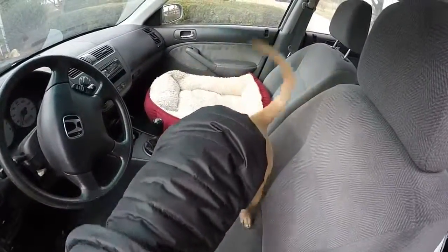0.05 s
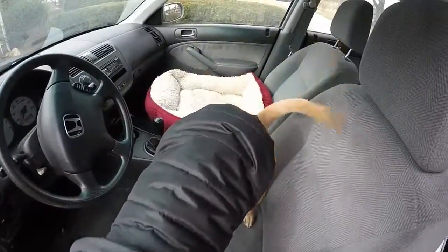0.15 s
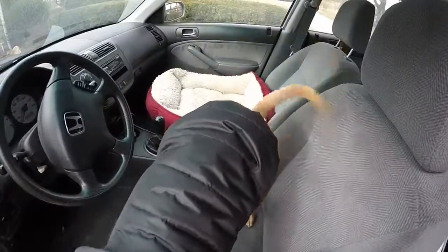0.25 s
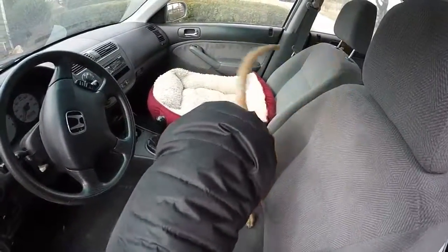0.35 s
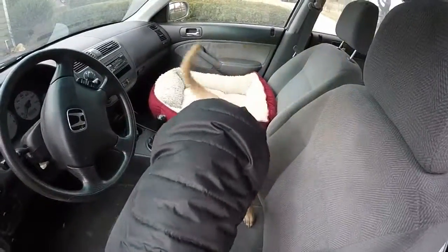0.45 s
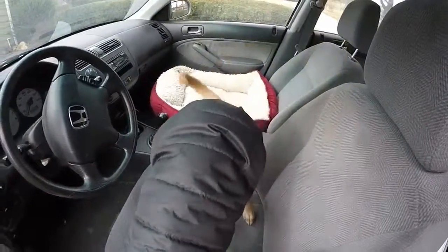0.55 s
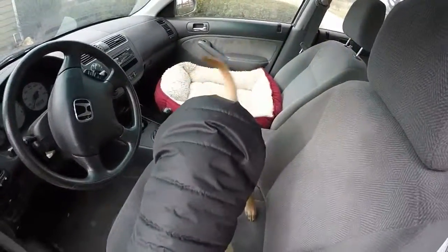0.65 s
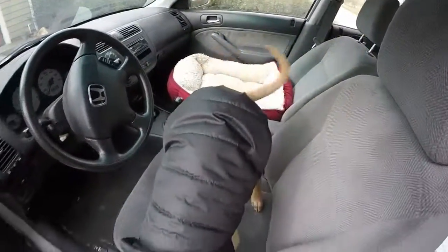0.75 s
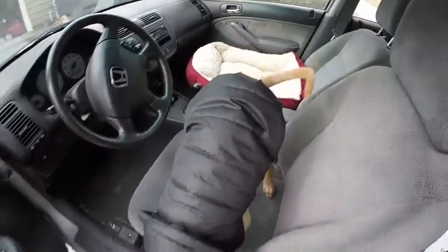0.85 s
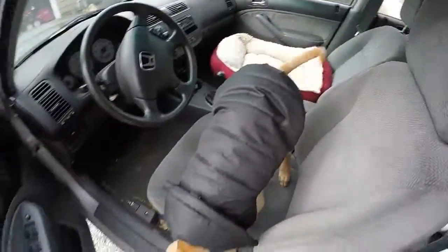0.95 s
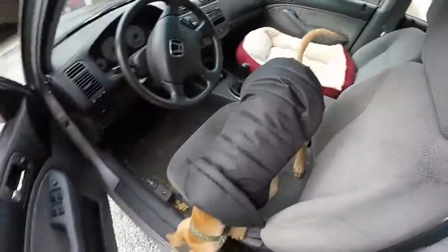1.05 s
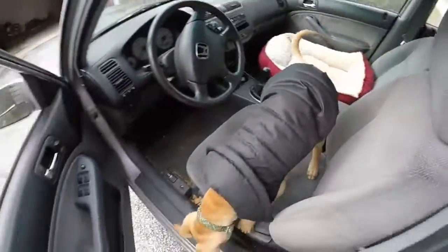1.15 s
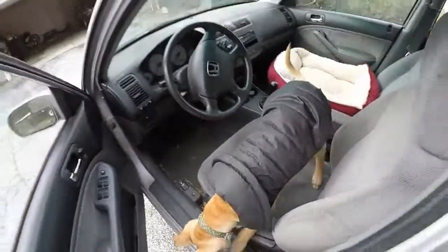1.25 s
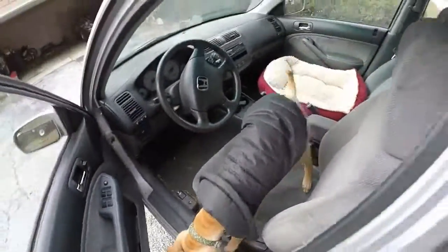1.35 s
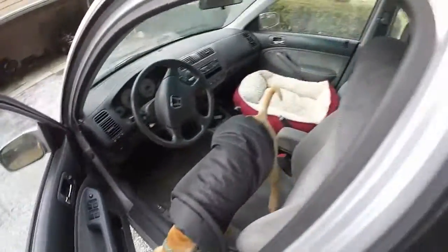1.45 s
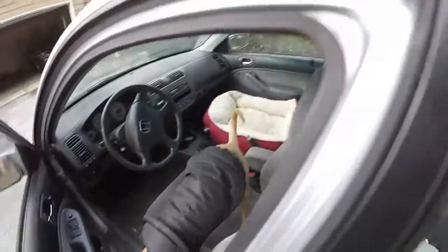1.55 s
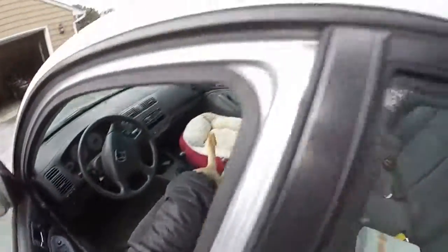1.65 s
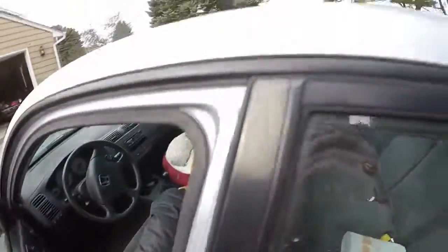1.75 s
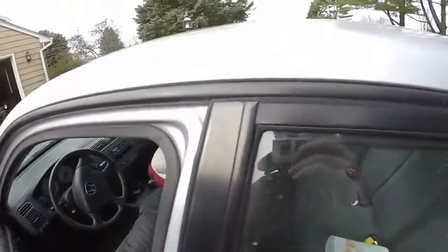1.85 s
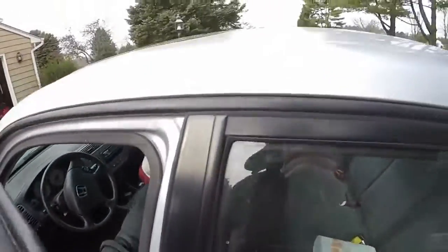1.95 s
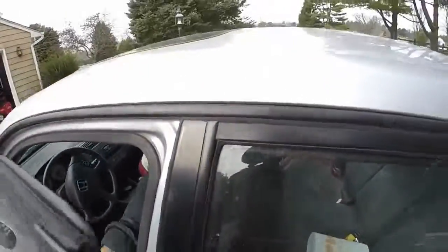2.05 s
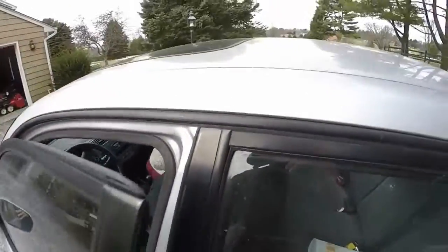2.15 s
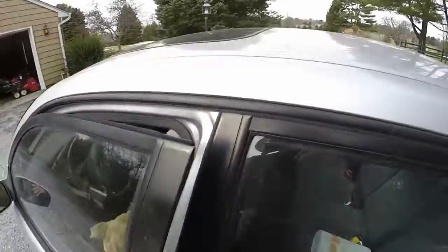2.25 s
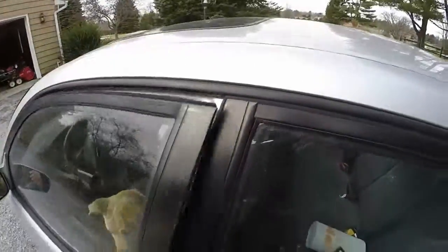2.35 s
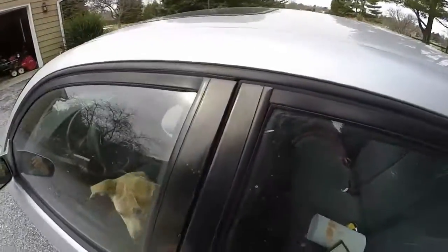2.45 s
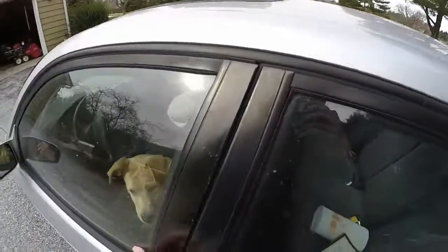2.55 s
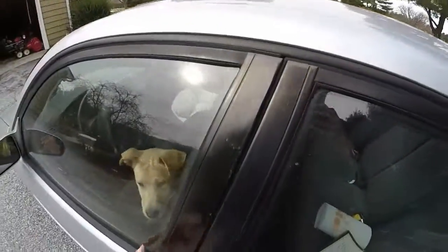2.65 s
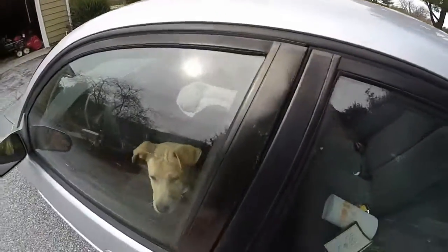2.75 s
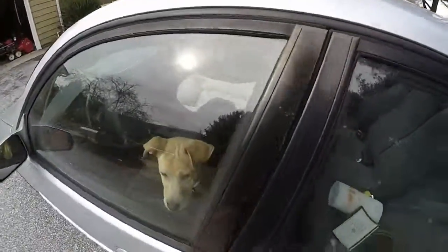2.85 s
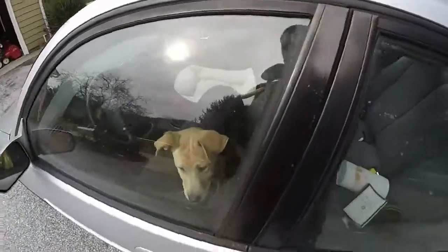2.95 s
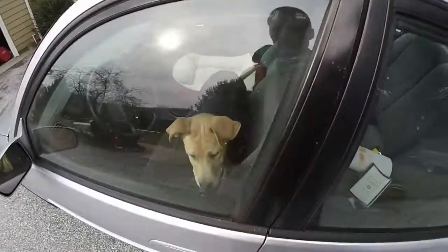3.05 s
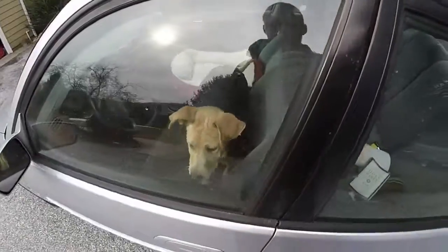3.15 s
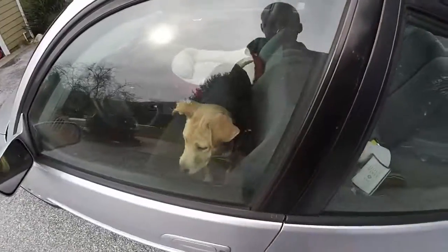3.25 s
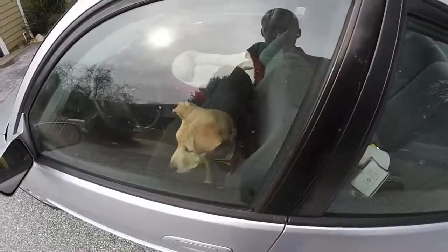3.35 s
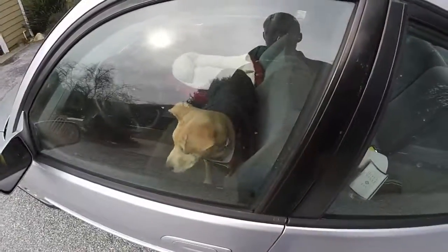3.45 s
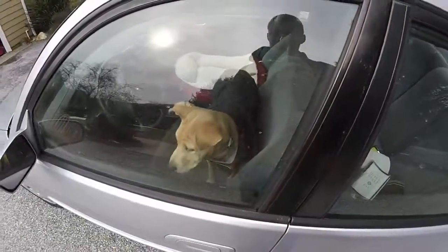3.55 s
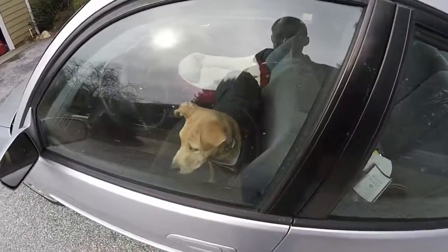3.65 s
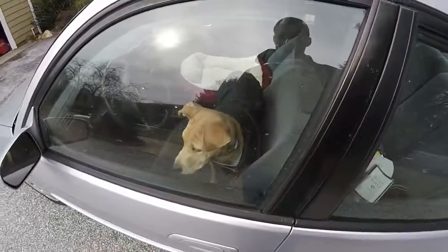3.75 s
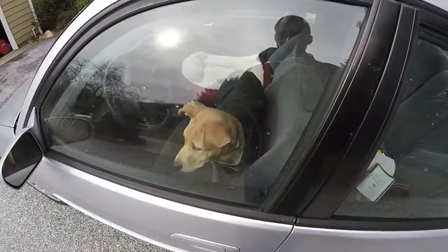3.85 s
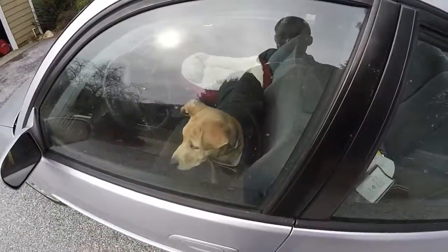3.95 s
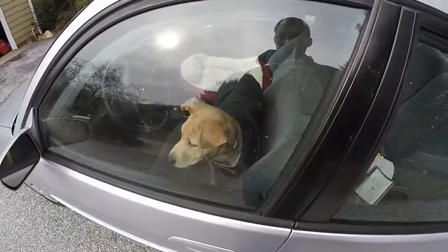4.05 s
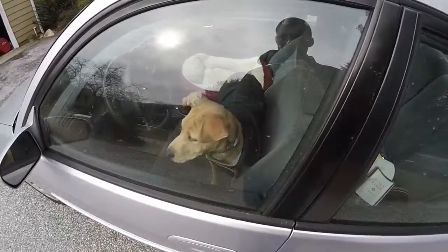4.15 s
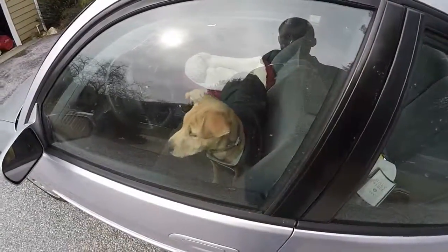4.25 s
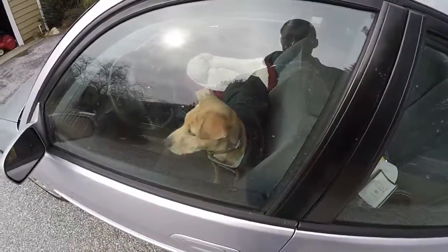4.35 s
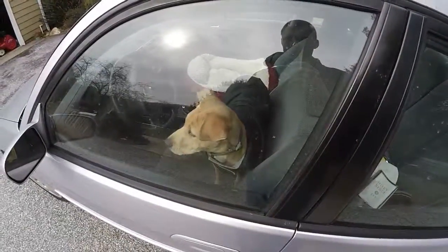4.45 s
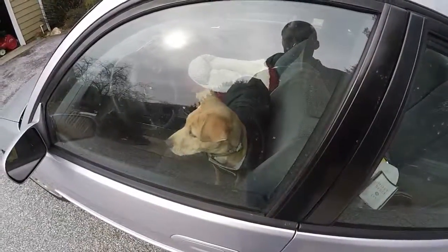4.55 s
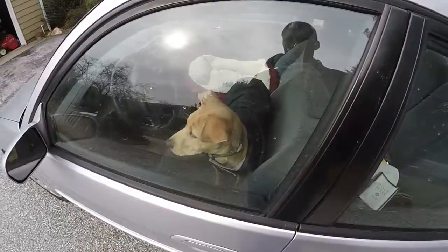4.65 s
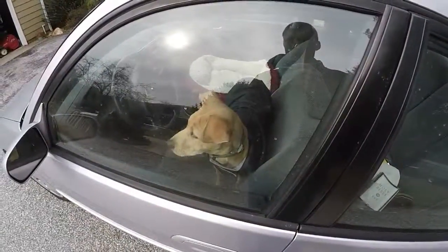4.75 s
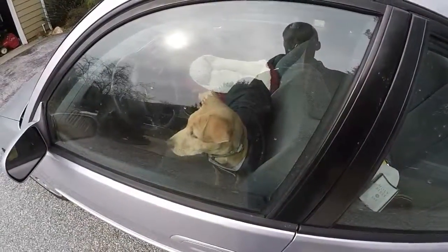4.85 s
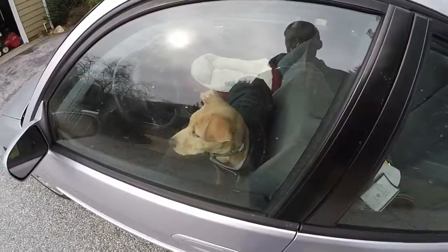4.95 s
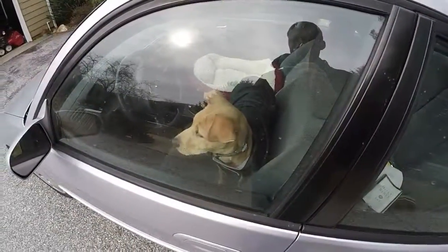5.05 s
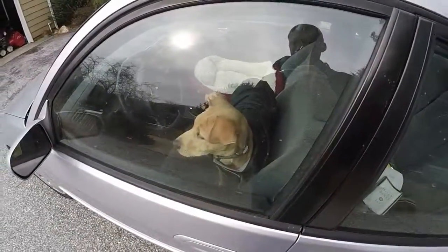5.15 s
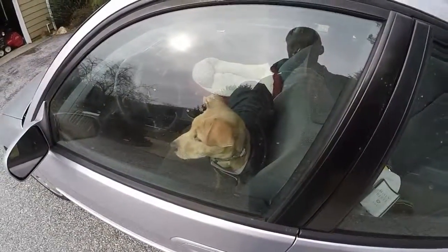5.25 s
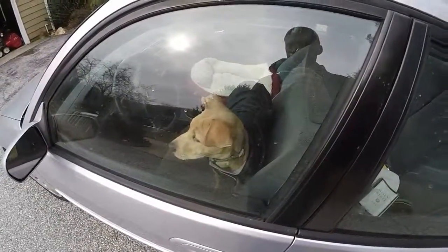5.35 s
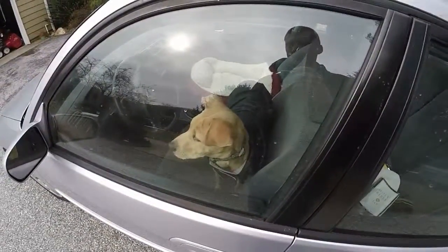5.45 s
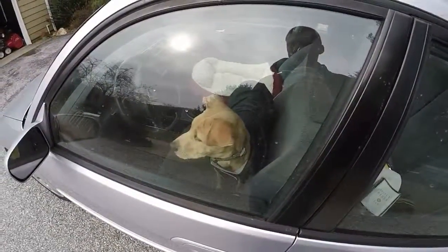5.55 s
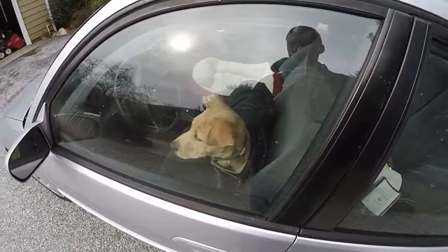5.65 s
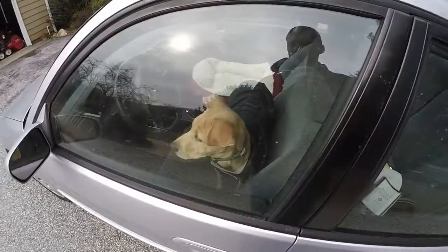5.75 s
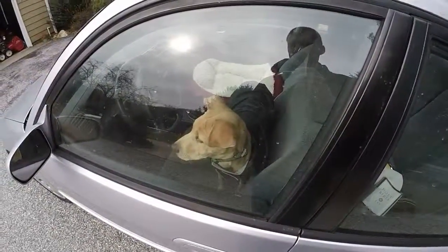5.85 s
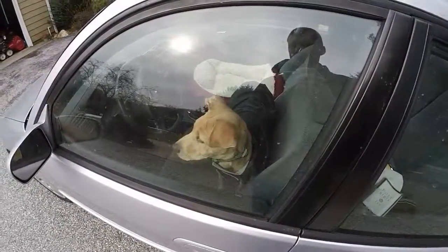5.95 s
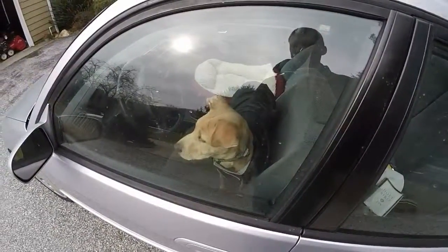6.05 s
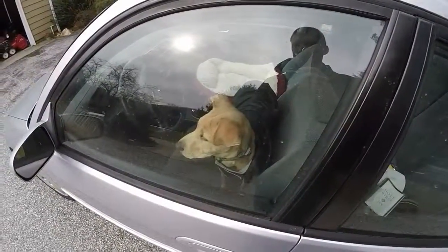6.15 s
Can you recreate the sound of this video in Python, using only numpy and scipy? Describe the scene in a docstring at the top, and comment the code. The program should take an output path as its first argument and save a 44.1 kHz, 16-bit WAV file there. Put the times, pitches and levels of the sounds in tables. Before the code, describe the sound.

Cloth rustles, small knocks and a thin dog whine lead to one solid car door slam, followed by faint birds and distant traffic.

```python
"""Shutting a car door on a dog

A dog in a padded jacket shuffles on a car seat: friction makes the cloth rustle, impacts ring the trim,
and a thin harmonic whine falls. Someone steps back and swings the door shut. It meets its seal and
latches twice, exciting the damped modes of latch, door skin and enclosed air, so the cabin booms.
The person's steps and sleeve scuff softly amid a faint low hum, distant traffic and a few small birds."""
import sys
import numpy as np
from scipy import signal
from scipy.fft import rfft, irfft, next_fast_len
from scipy.io import wavfile
from scipy.ndimage import map_coordinates

SR = 44100
rng = np.random.default_rng(int(sys.argv[2]) if len(sys.argv) > 2 else 0)


def int16_out(signal):
    """Quantize to a 16-bit WAV file."""
    q = np.round(np.clip(np.atleast_2d(signal).T, -1, 1) * 32767)
    wavfile.write(sys.argv[1], SR, q.astype(np.int16))


N = 273905
TIME = np.arange(N) / SR
HIT_TIME = TIME[:SR // 2]


def amp(db):
    """Amplitude grows tenfold every 20 dB."""
    return 10 ** (np.asarray(db) / 20)

def unit(x):
    """Normalisation to an rms of 1."""
    return x / np.sqrt(np.mean(x ** 2) + 1e-20)

def spectrum(points):
    """A frequency response through (Hz, dB) points, interpolated on a log axis."""
    hz, db = np.transpose(points)
    return lambda f: amp(np.interp(np.log(f + 1), np.log(hz + 1), db))

def curves(rows):
    """Linear interpolation in time of each column after the first."""
    times, *columns = np.transpose(rows)
    return [np.interp(TIME, times, column) for column in columns]

def wobble(rate, size=N):
    """Smooth random modulation: a spline with `rate` knots a second."""
    return map_coordinates(rng.standard_normal(int(size * rate / SR) + 4), [TIME[:size] * rate])

def filtered(x, response):
    """Filtering multiplies the spectrum by a frequency response."""
    size = next_fast_len(len(x) + 8192)
    return irfft(rfft(x, size) * response(np.fft.rfftfreq(size, 1 / SR)), size)[:len(x)]

def noise(response, size):
    """Filtering colours white noise; the rms is 1."""
    return unit(filtered(rng.standard_normal(size), response))

def fade(t60, attack):
    """Damping: after a quick rise, amplitude falls 60 dB in t60 seconds."""
    return np.exp(-np.log(1000) * HIT_TIME / t60) * (1 - np.exp(-HIT_TIME / attack))

def ring(modes, attack, scatter_db):
    """Free vibration is a sum of damped modes, their strengths scattered at each strike."""
    return sum(amp(db + scatter_db * rng.normal()) * np.sin(2 * np.pi * hz * HIT_TIME)
               * fade(t60, attack) for hz, db, t60 in modes)

def crash(bands, attack):
    """Modes too dense to resolve act as decaying bands of noise about an octave wide."""
    return sum(noise(lambda f: np.exp(-2 * np.log2((f + 1) / hz) ** 2), len(HIT_TIME))
               * amp(db) * fade(t60, attack) for hz, db, t60 in bands)

def echo(x, t60):
    """Diffuse reflection: convolution with a decaying tail of noise."""
    tail = rng.standard_normal(len(HIT_TIME)) * fade(t60, attack=.005)
    return signal.fftconvolve(x, tail / np.linalg.norm(tail))[:N]

def add(track, start, sound):
    """Superposition of a sound on the track, from `start` seconds."""
    part = track[round(start * SR):][:len(sound)]
    part += sound[:len(part)]


# Far traffic. Each row: frequency in Hz, relative spectral density in dB.
TRAFFIC_SPECTRUM = [(12, -32), (20, -2), (121, -3.5), (148, -6), (230, -10), (264, -13.5), (287, -15.5),
                    (379, -19), (780, -18.5), (1840, -30.5), (2720, -29), (6080, -35.5), (7390, -40.5),
                    (8490, -41), (15200, -45)]
# A distant machine. Each row: frequency in Hz, relative level in dB.
HUM_PARTIALS = [(118.4, -52), (236.9, -61.5), (419.9, -68)]
# Air stirred against the microphone. Each row: time in seconds, level in dB.
DRAUGHT_LEVELS = [(0, -43.5), (.8, -49.5), (1.3, -39), (1.9, -43.5), (2.35, -47.5), (2.75, -38.5),
                  (3.1, -46), (3.6, -56)]
# Screening by the car's body. Each row: time in seconds, traffic gain in dB, hum gain in dB.
SHELTER_GAINS = [(0, -5.5, -7), (1.2, -3, -1.5), (2.2, .5, 0)]

def outdoors():
    """Traffic and hum start in the car's acoustic shadow; turbulence from moving about adds rumble."""
    traffic = amp(-45.5 + 0.22 * wobble(3.23)) * noise(spectrum(TRAFFIC_SPECTRUM), N)
    hum = sum(amp(db + 3 + 2.76 * wobble(7)) * np.sin(2 * np.pi * hz * TIME + .8 * wobble(11))
              for hz, db in HUM_PARTIALS)
    draught_db, = curves(DRAUGHT_LEVELS)
    rumble = spectrum([(10, -27), (28, -3), (70, -10), (200, -20.5), (1000, -64)])
    draught = amp(draught_db + 2.7 * wobble(10)) * noise(rumble, N)
    traffic_db, hum_db = curves(SHELTER_GAINS)
    return amp(traffic_db) * traffic + amp(hum_db) * hum + draught


def bird(contour_hz, notes):
    """Frequency modulation: each note is a pure tone gliding through the pitches of its contour, reached at
    even steps of time."""
    out = np.zeros(N)
    for start, length, db in notes:
        progress = np.linspace(0, 1, int(length * SR))
        pitch_hz = np.interp(progress, np.linspace(0, 1, len(contour_hz)), contour_hz)
        pitch_hz *= 1 + .009 * wobble(300, len(progress))
        envelope = np.sqrt(2 * abs(np.sin(np.pi * progress)))
        add(out, start, amp(db) * envelope * np.sin(2 * np.pi * np.cumsum(pitch_hz) / SR))
    return out

def birds():
    """Five kinds of short call, with faint reflections from trees and walls."""
    # Each note: start in seconds, length in seconds, level in dB.
    held = bird([6300, 7400, 7250, 7250, 7300, 7300], [(3.752, .078, -51.5)])
    falling = bird([8150, 7480, 7250], [(3.95, .027, -53), (4.98, .026, -55)])
    arched = bird([3470, 4160, 3600], [(4.735, .0506, -58)])
    stepped = bird([2550, 2700, 3350, 3300], [(5.27, .045, -64), (5.555, .043, -61), (5.982, .04, -56.5)])
    low = bird([1380, 1650, 1460], [(4.53, .09, -62), (4.93, .11, -64)])
    calls = held + falling + arched + stepped + low
    return calls + amp(-8) * echo(calls, t60=.45)


def cloth(response, size, grain_db, grain_rate):
    """Stick-slip friction: fabric moves in tiny uneven jerks, which modulate a noise."""
    slips = rng.standard_normal(size) * amp(grain_db * wobble(grain_rate, size))
    return unit(filtered(slips, response))

# A coat sleeve beside the microphone. Each row: time in seconds, level in dB.
SLEEVE_LEVELS = [(0, -54), (.62, -57), (.95, -48.5), (1.5, -52), (1.9, -56.5), (2.4, -54.5), (2.7, -59),
                 (4, -60.5)]

def sleeve():
    """Faint sliding friction of a sleeve, which quietens as the arm comes to rest."""
    level_db, = curves(SLEEVE_LEVELS)
    colour = spectrum([(200, -12), (600, -3.5), (1500, 1), (4000, -3), (9000, -10.5), (15000, -18)])
    return amp(level_db + 0.82 * wobble(25.13)) * cloth(colour, N, grain_db=1, grain_rate=500)


# Contact noise. Each row: frequency in Hz, relative spectral density in dB.
CLICK_SPECTRUM = [(150, -23), (500, 0), (1350, -0.5), (2500, -6.5), (4800, -7.5), (8000, -16), (15000, -27)]

def click(low_hz, bright_hz, t60, attack):
    """A brief contact is broadband, but a part radiates little below its lowest mode."""
    def radiated(f):
        treble_loss = np.hypot(1, (f / bright_hz) ** 2)
        bass_loss = np.hypot(1, (low_hz / (f + 1)) ** 2)
        return spectrum(CLICK_SPECTRUM)(f) / treble_loss / bass_loss
    return noise(radiated, len(HIT_TIME)) * fade(t60, attack)


# Dull rubbing. Each row: frequency in Hz, relative spectral density in dB.
RUB_SPECTRUM = [(60, -18), (150, -0.5), (330, 5.5), (600, -1), (1300, -3.5), (3000, -12.5), (6000, -22),
                (15000, -45)]
# The dog shuffles on the seat. Each row: time in seconds, relative level in dB.
DOG_SHUFFLE = [(0.0, -51), (0.11, -59.5), (0.75, -58), (0.86, -52), (1.03, -42.5), (1.16, -44.5),
               (1.68, -44), (1.94, -48.5), (2.26, -51.5), (2.42, -46)]
# Soft scuffs of a person's steps and sleeve after the door shuts, in the same columns.
PERSON_SCUFFS = [(2.7, -55), (2.856, -57.5), (3.074, -48.5), (3.3, -54.5)]

def shuffle_and_scuffs(creases_per_s=160, fade_db_per_s=68):
    """Friction and random creasing: first the dog on the seat, then the person's steps and sleeve."""
    level_db, = curves(np.vstack([DOG_SHUFFLE, PERSON_SCUFFS]))
    fade_db = fade_db_per_s * np.maximum(TIME - PERSON_SCUFFS[-1][0], 0)
    rub = cloth(spectrum(RUB_SPECTRUM), N, grain_db=2, grain_rate=400)
    creases = (rng.random(N) < creases_per_s / SR) * amp(4.5 * rng.standard_normal(N))
    tick = click(low_hz=700, bright_hz=5000, t60=.008, attack=.00018)
    crinkle = unit(signal.fftconvolve(creases, tick)[:N])
    return amp(level_db - 0.5 - fade_db + 1.5 * wobble(18)) * (rub + amp(-11) * crinkle)


def swell(length):
    """Friction noise follows sliding speed, which rises and falls a little unevenly."""
    return np.sin(np.pi * np.minimum(HIT_TIME / length, 1)) * amp(1.3 * wobble(72, len(HIT_TIME)))

def swish(length, centre_hz, q):
    """The tiny slips of a sliding weave make band-pass noise."""
    def weave(f):
        detuning = (f + 1) / centre_hz - centre_hz / (f + 1)
        return 1 / np.hypot(1, q * detuning) / np.hypot(1, f / 7500)
    return swell(length) * cloth(weave, len(HIT_TIME), grain_db=2, grain_rate=450)

# Strokes of the dog's nylon jacket and, last, a soft scuff from the person after the door shuts.
# Each row: midpoint in seconds, length in seconds, level in dB, swish centre in Hz.
CLOTH_STROKES = [(0.151, 0.089, -53.5, 5500), (0.37, 0.093, -49.5, 5500), (.51, .17, -50.5, 5500),
                 (1.051, 0.15, -49, 2510), (1.165, .16, -52, 4400), (1.399, .15, -43, 6200),
                 (1.539, .1, -35, 3370), (1.589, 0.054, -45, 6360), (2.33, 0.23, -56, 7000),
                 (3.1, .2, -55, 1400)]

def rustle():
    """Friction gives a dull rub and a swish, which is higher and broader for a faster slide."""
    out = np.zeros(N)
    for middle, length, db, swish_hz in CLOTH_STROKES:
        rub = swell(length) * cloth(spectrum(RUB_SPECTRUM), len(HIT_TIME), grain_db=2, grain_rate=370)
        slide = swish(length, swish_hz, q=1.54 * 3000 / swish_hz)
        add(out, max(middle - length / 2, 0), amp(db) * (rub + slide))
    # The jacket drags once across the seat's edge.
    add(out, .958, amp(-37.5) * swish(length=.05, centre_hz=2800, q=3))
    return out


# The dog's voice. Each row: harmonic number, relative level in dB.
WHINE_HARMONICS = [(1, -15.5), (2, -1), (3, -15.5), (4, -26)]
# Its notes. Each row: start and length in seconds, first and last pitch in Hz, level in dB.
WHINE_NOTES = [(1.835, 0.34, 1338, 1150, -44.5), (2.15, .095, 1340, 1204, -54.5)]

def whine(rise_s=.017, fade_s=.08):
    """A harmonic series, strongest on its second member; the fundamental holds briefly, then sags."""
    out = np.zeros(N)
    for start, length, first_hz, last_hz, level_db in WHINE_NOTES:
        t = TIME[:int(length * SR)]
        sag = np.sin(np.pi / 2 * (t / length) ** 1.07) ** 2
        jitter = .005 * wobble(248, len(t))
        waver = .0038 * wobble(25.3, len(t))
        pitch_hz = (first_hz + (last_hz - first_hz) * sag) * (1 + jitter + waver)
        phase = 2 * np.pi * np.cumsum(pitch_hz) / SR
        envelope = np.minimum(t / rise_s, 1) * np.minimum((length - t) / fade_s, 1)
        tone = sum(amp(db + 2.9 * wobble(45.4, len(t))) * np.sin(k * phase) for k, db in WHINE_HARMONICS)
        add(out, start, np.sqrt(2) * amp(level_db) * envelope * tone)
    return out


# Modes of the trim. Each row: ratio to the lowest frequency, relative level in dB.
TRIM_MODES = [(1, 0), (1.37, -7), (1.9, -8), (2.7, -11)]

def thud(hz, cycles, bright_hz, attack):
    """Constant Q: each mode dies in the same number of cycles. Soft contact weakens the overtones."""
    modes = [(hz * k, db - 12 * (k - 1) * hz / bright_hz, cycles / (hz * k)) for k, db in TRIM_MODES]
    return ring(modes, attack, scatter_db=3.5)

# Paws and body against seat and door. Each row: start in seconds, level in dB, pitch in Hz.
BODY_BUMPS = [(.154, -31, 33.8), (.678, -34, 146), (1.246, -18.5, 182), (1.264, -21, 135),
              (1.297, -27, 69.3), (1.37, -27, 229), (1.594, -36, 85), (1.753, -23, 239), (2.822, -28, 48)]

def bumps():
    """A soft body damps what it hits, leaving a low thud and a faint scuff."""
    out = np.zeros(N)
    for start, db, hz in BODY_BUMPS:
        body = thud(hz, cycles=15.2, bright_hz=800, attack=.27 / hz)
        scuff = click(hz, bright_hz=1800, t60=.047, attack=.0011)
        add(out, start, amp(db) * (body + amp(-23.5) * scuff))
    return out

# Taps on the shut door from inside. Each row: start in seconds, level in dB.
DOOR_TAPS = [(3.413, -26), (3.448, -12.5)]

def taps(hz=344):
    """Heavy damping in the door's padding lets only a short, dull tock through."""
    out = np.zeros(N)
    for start, db in DOOR_TAPS:
        body = thud(hz, cycles=8.8, bright_hz=900, attack=.0014)
        contact = click(hz, bright_hz=1500, t60=.025, attack=.0008)
        add(out, start, amp(db) * (body + amp(-24) * contact))
    return out

# Hard knocks on sill and trim. Each row: start in seconds, thud level in dB, thud pitch in Hz,
# click level in dB, treble cutoff in Hz.
TRIM_KNOCKS = [(.110, -25.5, 518, -34.5, 1500), (.118, -28, 247, -42, 1500),
               (.130, -42.5, 297, -33.5, 5000), (.301, -55, 400, -43, 3000), (.680, -43, 296, -42, 2200),
               (.829, -29, 1320, -26.5, 6000), (1.025, -48, 450, -34, 7000), (1.064, -42, 500, -33.5, 2500),
               (1.242, -28.5, 249, -33, 1800), (1.317, -47, 300, -37.5, 2500),
               (1.344, -26.5, 277, -30.5, 8000), (1.420, -27, 320, -26, 4000), (1.635, -31, 420, -39, 3000),
               (1.7506, -21.5, 420, -22.5, 6000), (1.816, -46, 500, -33, 4000),
               (1.8236, -26.5, 287, -25.5, 9000), (1.986, -36.5, 420, -41, 2000),
               (2.154, -38, 480, -39, 2000), (2.220, -34.5, 191, -37, 1400), (2.869, -30, 311, -39, 2500)]

def knocks(snap_db_per_db=0.5):
    """Impact on padded plastic gives a snap, a click and a thud; a duller contact rises more slowly."""
    out = np.zeros(N)
    for start, thud_db, hz, click_db, bright_hz in TRIM_KNOCKS:
        body = thud(hz, cycles=22.4, bright_hz=bright_hz, attack=.00028 + 1.2 / bright_hz)
        snap_db = 3.5 + snap_db_per_db * (click_db + 22)  # the first crack grows faster than the force
        snap = amp(snap_db) * click(2 * hz, 2 * bright_hz, t60=.0061, attack=.00026)
        contact = click(hz, bright_hz, t60=.045, attack=.00041)
        add(out, start, amp(thud_db) * body + amp(click_db) * (snap + contact))
    return out

# Loose parts in the door after it shuts. Each row: start in seconds, level in dB.
DOOR_RATTLES = [(2.571, -30), (2.610, -36), (2.630, -35), (2.641, -37), (2.887, -35), (3.421, -40.5)]

def rattles():
    """Small parts radiate little bass, so their impacts are bright ticks."""
    out = np.zeros(N)
    for start, db in DOOR_RATTLES:
        add(out, start, amp(db) * click(low_hz=1200, bright_hz=6500, t60=.018, attack=.0003))
    return out


# Resonances. Each row: frequency in Hz, relative level in dB, time to fall 60 dB in seconds.
LATCH_MODES = [(594, -12.5, 0.16), (736, -13.5, 0.095), (962, -8.5, 0.1), (1228, 0, 0.061),
               (1350, -6, 0.045), (1543, -11.5, 0.051), (2330, -24.5, .1), (2930, -16, 0.094)]
LATCH_BANDS = [(596, -11.5, 0.15), (1200, -7.5, 0.087), (2340, -14.5, 0.13), (4400, -11, 0.065),
               (8000, -25, 0.1), (14000, -31, .1)]  # the latch's dense metallic crash
PANEL_MODES = [(117.3, -12.5, 0.48), (169.6, -11.5, 0.28), (221.2, -6, 0.31), (246.4, -6, 0.2),
               (270, -14, 0.19), (281, -9, 0.18), (377.5, -5.5, 0.17), (444.5, -10, 0.167),
               (501, -16.5, 0.11), (543, -15, 0.094)]  # door skin and window
PANEL_BANDS = [(149, -18, 0.75), (300, -8, 0.25), (700, -21, 0.38), (1550, -29.5, 0.39),
               (3680, -32.5, 0.41)]  # their dense modes
CABIN_MODES = [(36.3, -2, 0.38), (48, -4.5, 0.24), (74, 0.5, 0.11), (94.5, -3, 0.086)]  # the enclosed air
# The door meets seal, striker and frame. Each row: start in seconds, then the levels in dB of
# latch crash, latch ring, panel and cabin boom.
DOOR_CONTACTS = [(2.439, -30, -29.5, -28, -34), (2.450, -34, -49, -18, -31), (2.461, -17, -38, -17, -22),
                 (2.468, -10, -7, -20.5, -47), (2.475, -18, -21, -12.5, -30),
                 (2.483, -32, -43, -14.5, -16.5), (2.492, -13, -24, -20, -26),
                 (2.521, -25, -32, -14.5, -11), (2.548, -44, -42, -31, -27)]

def door():
    """Impulsive excitation: each contact shakes the latch, flexes the skin and pumps the cabin air."""
    out = np.zeros(N)
    for start, crash_db, ring_db, panel_db, boom_db in DOOR_CONTACTS:
        latch = amp(crash_db) * crash(LATCH_BANDS, attack=.00069)
        latch += amp(ring_db) * ring(LATCH_MODES, attack=.0003, scatter_db=2.5)
        panel = ring(PANEL_MODES, attack=.0014, scatter_db=1.6) + crash(PANEL_BANDS, attack=.0012)
        boom = ring(CABIN_MODES, attack=.0017, scatter_db=0)
        add(out, start, latch + amp(panel_db) * panel + amp(boom_db) * boom)
    return out


def scene():
    """The sources superpose at one close microphone; the hard knocks reverberate in the cabin."""
    hard = knocks()
    contacts = hard + amp(-11) * echo(hard, t60=.13) + bumps() + taps() + rattles()
    nearby = door() + contacts + rustle() + shuffle_and_scuffs() + sleeve() + whine()
    return (nearby + birds() + outdoors())[None]

def record(dry):
    """Soft saturation rounds the highest peaks; band limiting sheds the deepest rumble and top treble."""
    ceiling, low_cut_hz, top_hz = .76, 12.4, 15400
    rounded = dry / (1 + abs(dry / ceiling) ** 6) ** (1 / 6)
    band = lambda f: 1j * f / (low_cut_hz + 1j * f) / np.sqrt(1 + (f / top_hz) ** 300)
    return np.array([filtered(channel, band) for channel in rounded])


dry = scene()
out = record(dry)
int16_out(out)
```